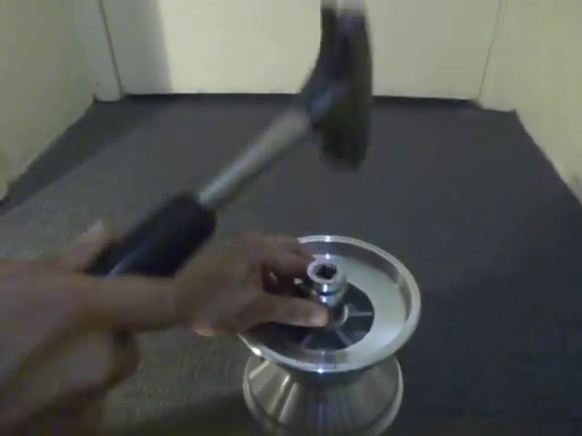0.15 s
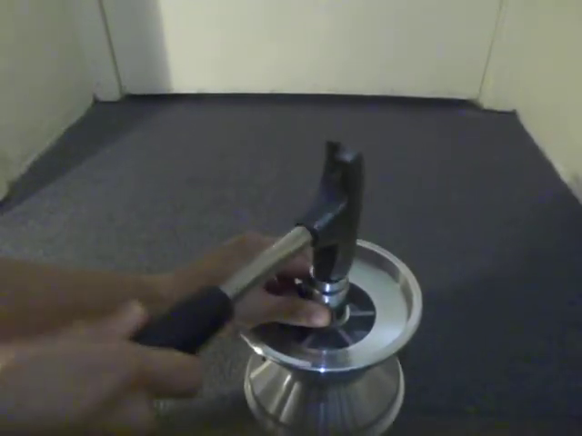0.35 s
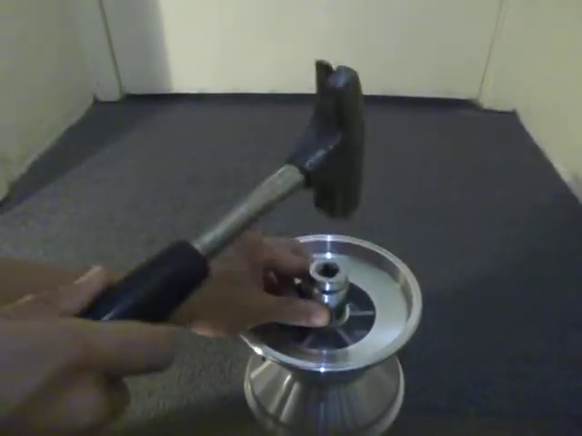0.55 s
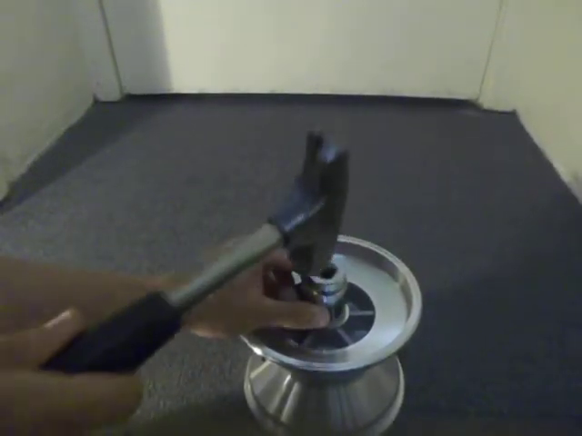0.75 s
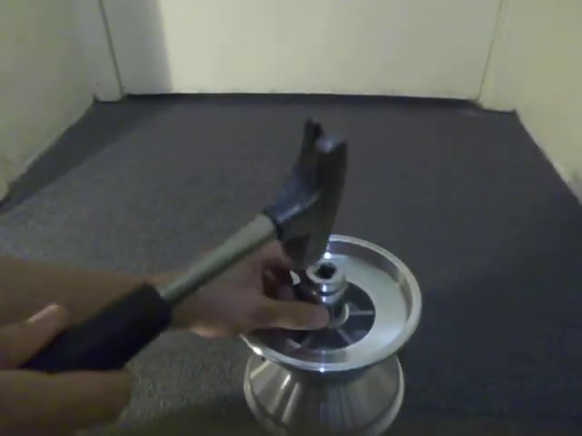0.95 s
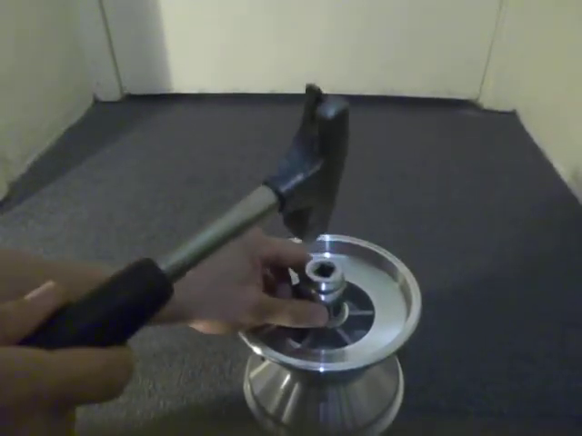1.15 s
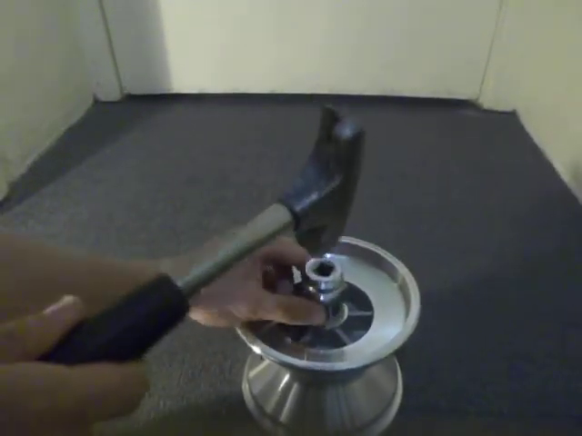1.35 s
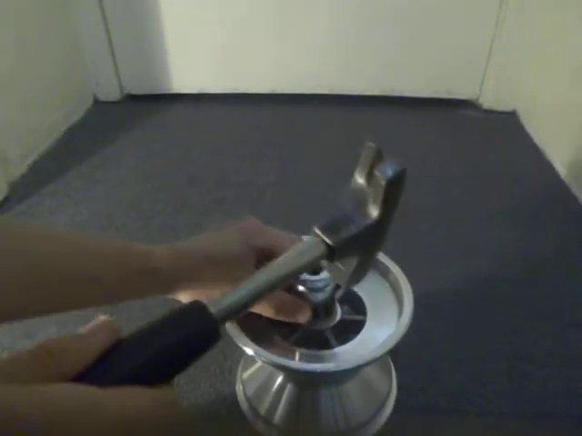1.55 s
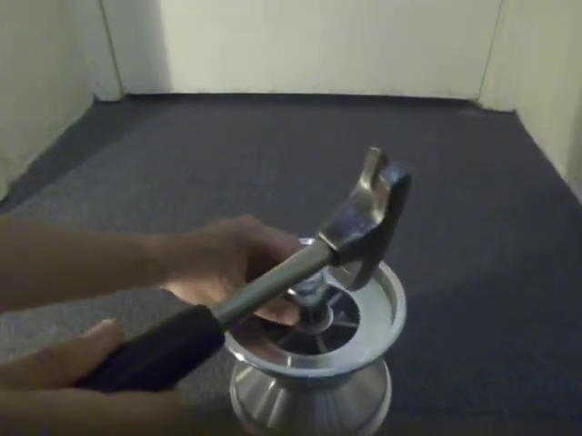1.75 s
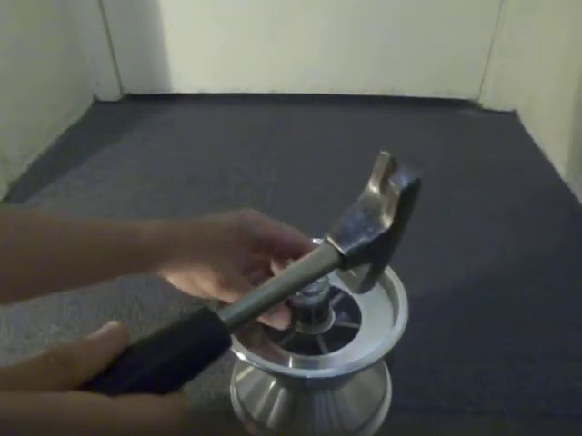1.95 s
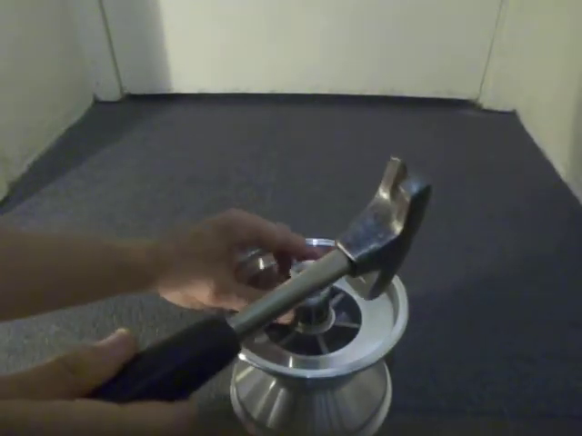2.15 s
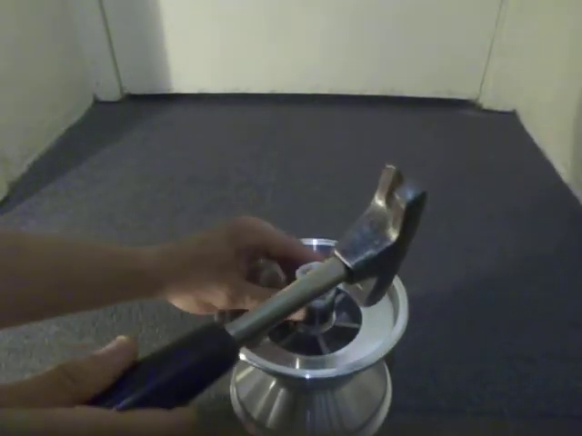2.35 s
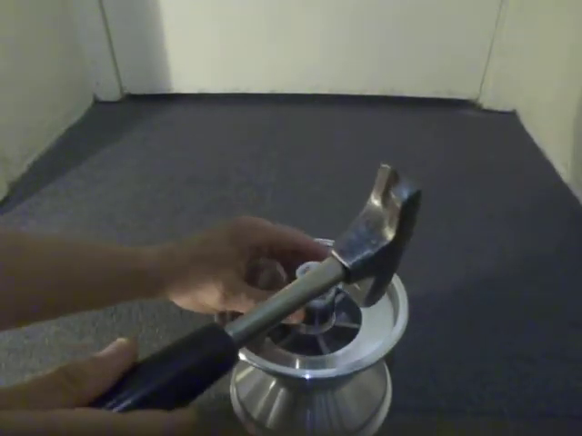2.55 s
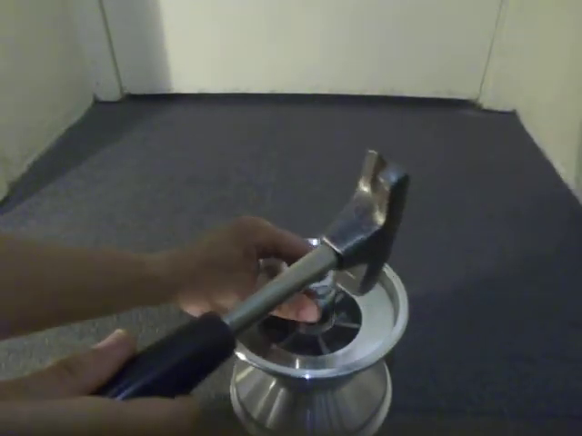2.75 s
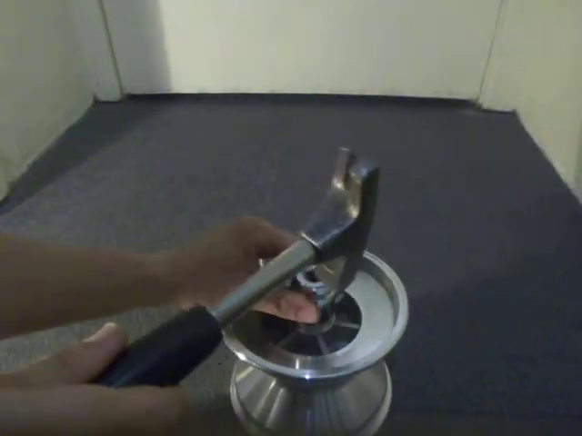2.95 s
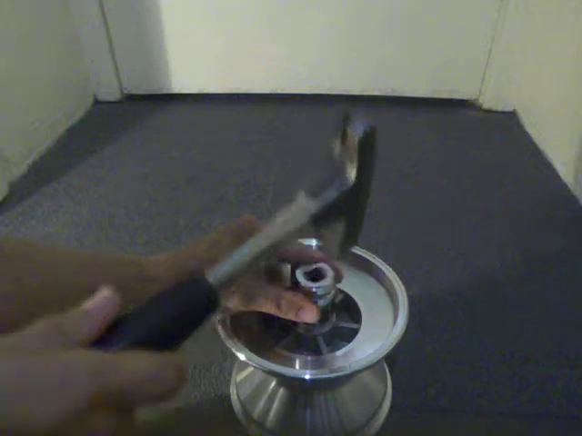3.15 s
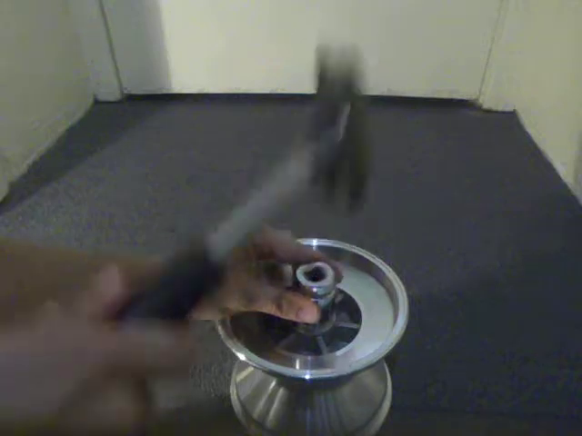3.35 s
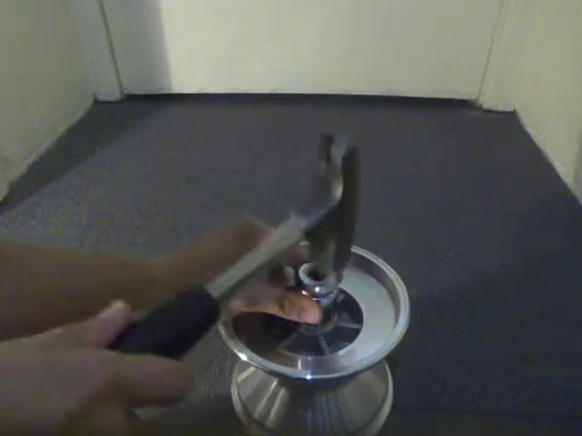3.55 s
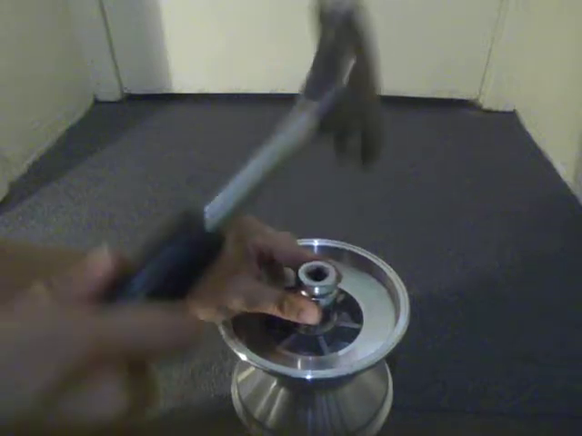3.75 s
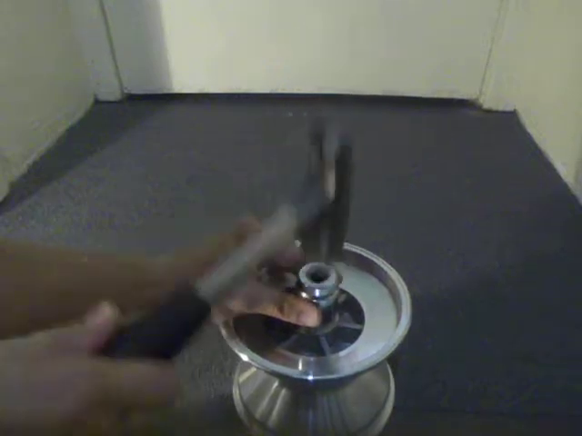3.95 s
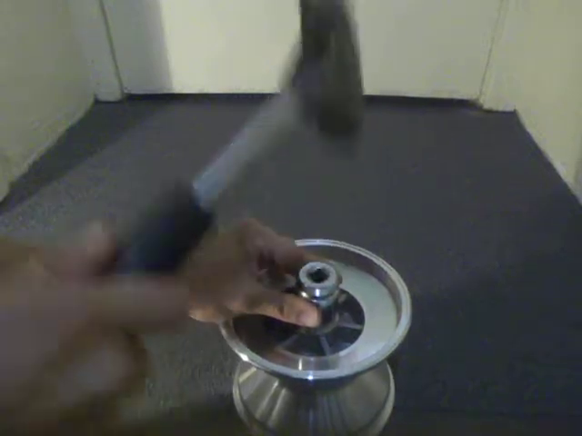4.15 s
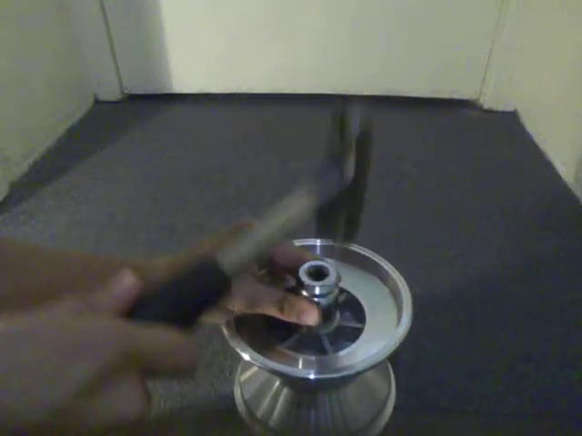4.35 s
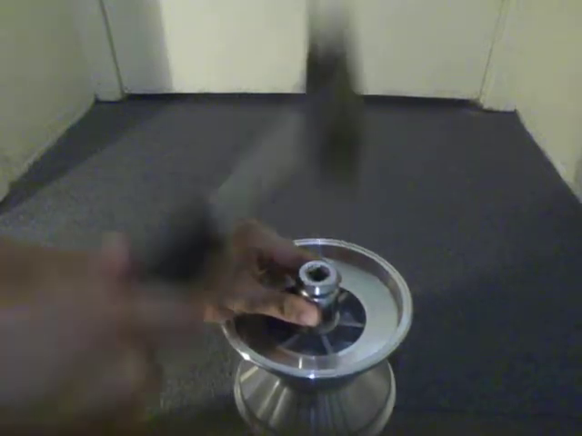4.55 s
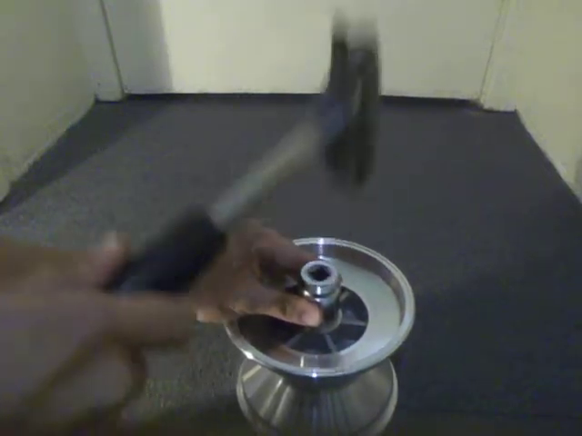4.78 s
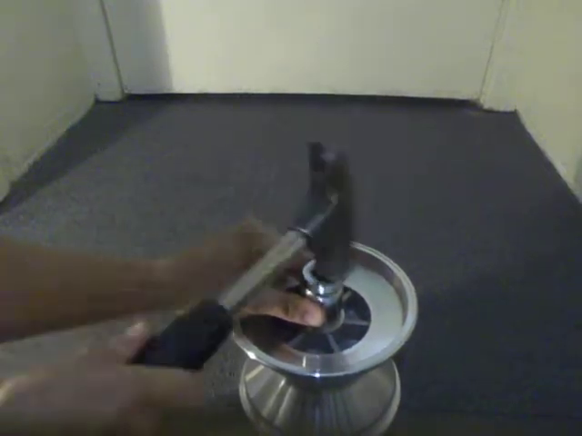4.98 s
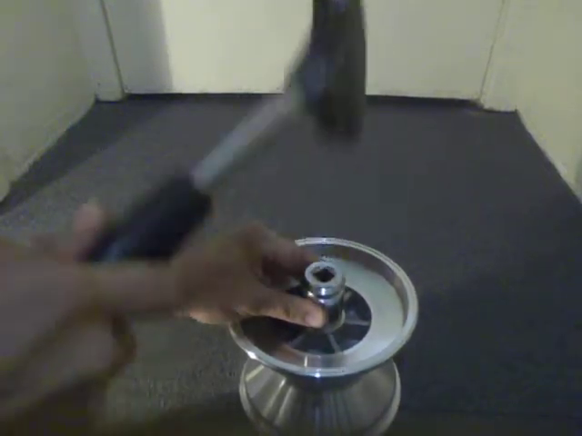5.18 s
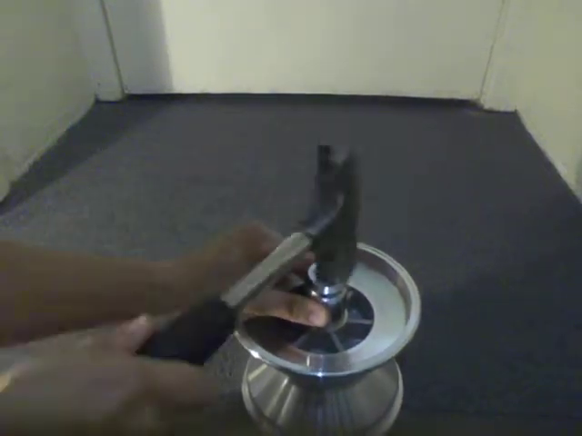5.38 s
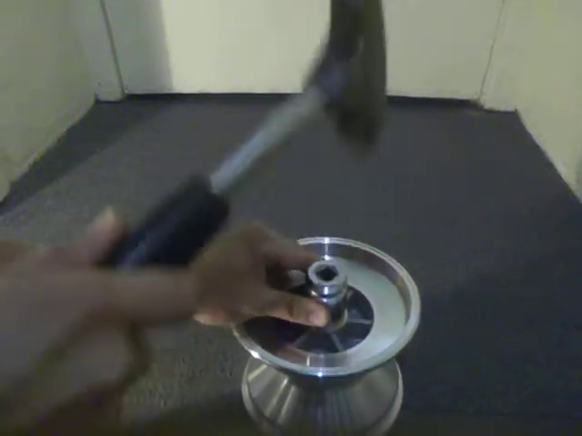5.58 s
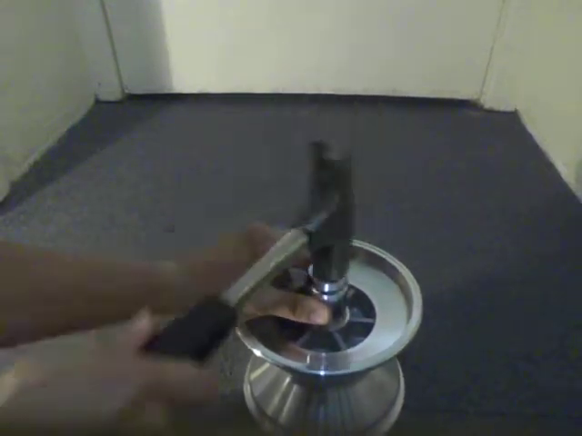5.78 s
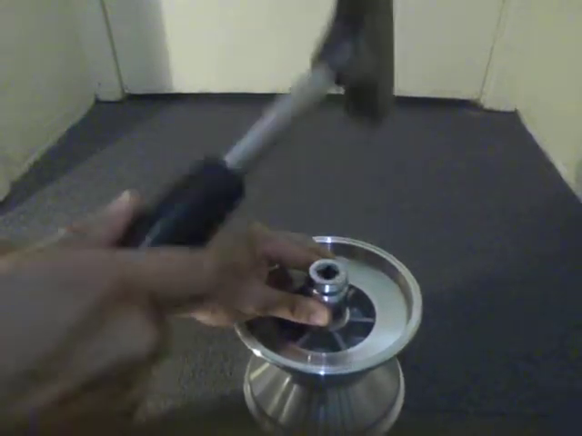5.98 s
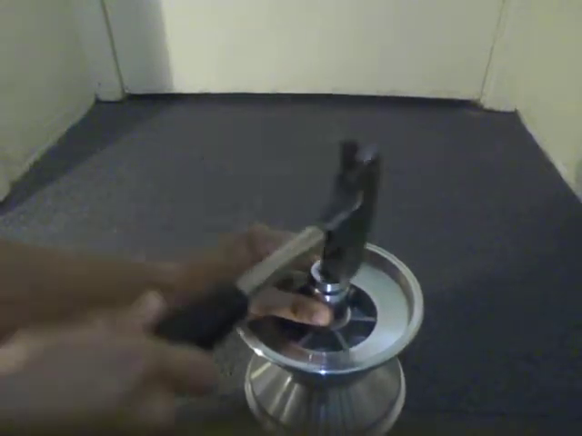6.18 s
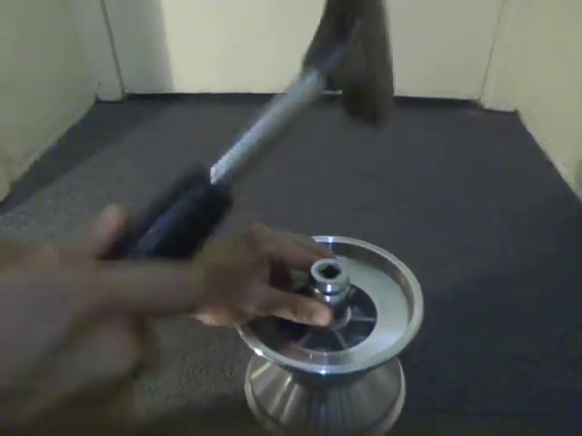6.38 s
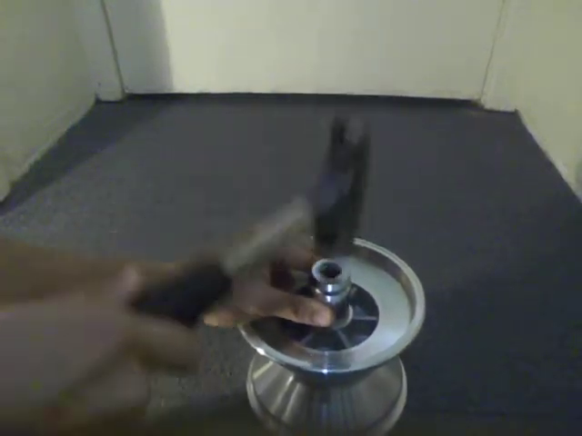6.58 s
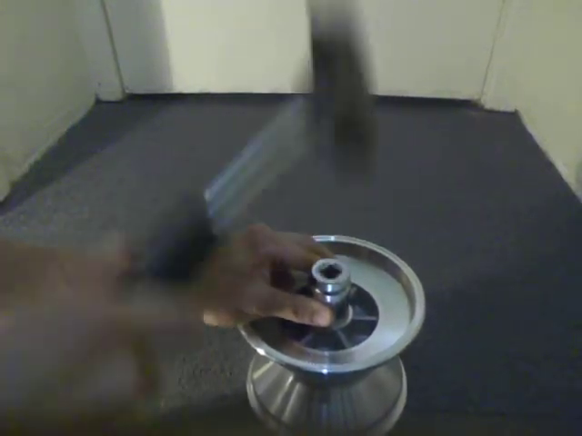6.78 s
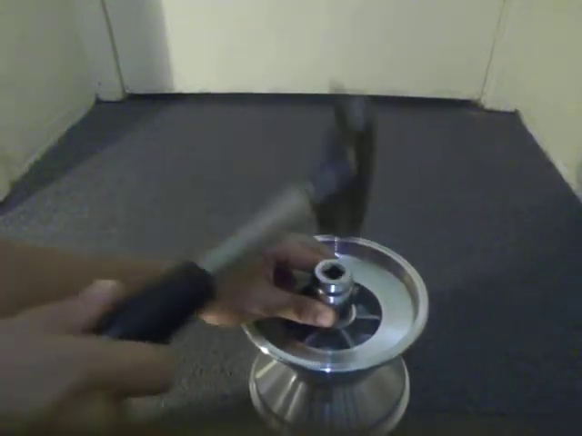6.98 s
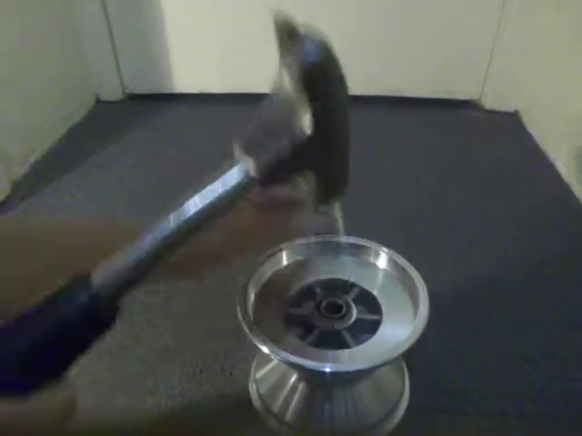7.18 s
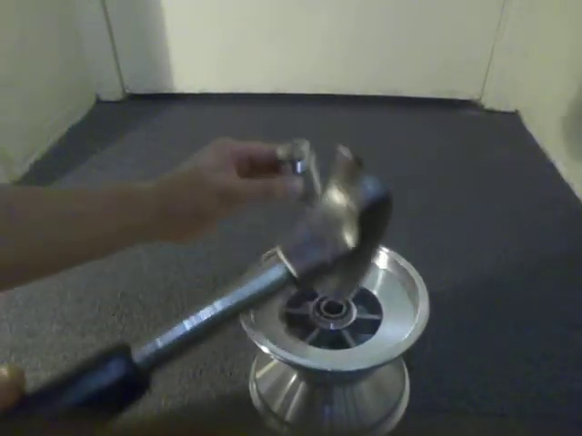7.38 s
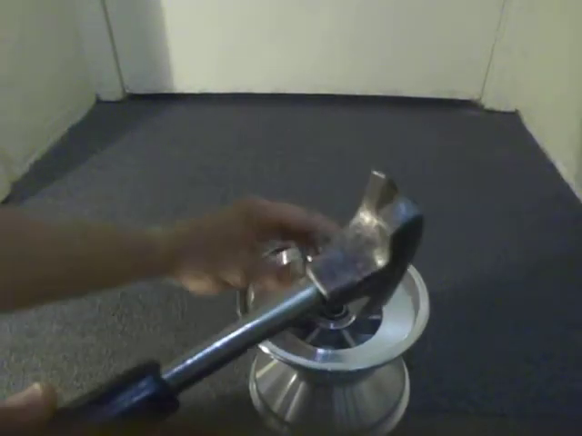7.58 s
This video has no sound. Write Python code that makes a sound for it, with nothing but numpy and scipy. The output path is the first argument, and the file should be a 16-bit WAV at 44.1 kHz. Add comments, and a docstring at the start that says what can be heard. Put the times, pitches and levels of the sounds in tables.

```python
"""Hammering a bearing into a wheel

A hammer drives a steel socket onto the bearing of an alloy wheel, on carpet in a narrow hallway.
We hear one blow, light taps as the socket is set straight, ten more blows, and a clink as it is
lifted off. Each blow is a knock of steel on steel that makes the wheel clank and the socket ping.
The hallway echoes, and the blows overload a small recorder with a low sampling rate."""
import sys
import numpy as np
from scipy import signal
from scipy.fft import rfft, irfft
from scipy.io import wavfile

SR = 44100
rng = np.random.default_rng(int(sys.argv[2]) if len(sys.argv) > 2 else 0)


def persist_wave(psi):
    """Save psi, clipped to +-1, as 16-bit WAV."""
    counts = np.round(np.clip(psi, -1, 1) * 32767).astype(np.int16)
    wavfile.write(sys.argv[1], SR, np.atleast_2d(counts).T)


N = 336042

# The wheel's ringing tones: f/Hz, level/dB, t60/s (the time to fade by 60 dB)
WHEEL_TONES = [(523, -11, .05), (640, -6.5, 0.082), (782, -4, .07), (836, -0.5, 0.18), (860, -4, .06),
               (920, -1, .08), (953, -4, .06), (1002.5, -8.5, 0.054), (1057, -4.5, .08), (1077, -3.5, 0.14),
               (1113.3, -1, 0.054), (1162.3, -2, .08), (1207, -4, 0.11), (1192, -3, 0.066),
               (1293, -5.5, .08), (1308, -4, .07), (1363, -8.5, 0.065)]
# The socket's side tones, which keep their pitch beside its main tone: f/Hz, level/dB, t60/s
SOCKET_TONES = [(2420, -21.5, 0.14), (3070, -14.5, .06), (3276, -7, 0.2), (5077, -20.5, .03)]


def blows():
    """Full hammer blows. The more firmly the socket sits, the lower and shorter its ping."""
    # t/s, clank level/dB, clank centre/Hz, ping level/dB, seating (0 bounces free, 1 stays pressed in)
    hits = [(-0.21, -19.5, 990, -8.5, 0), (0.169, -7, 1017, -4.5, 0), (3.2906, -7.5, 1195, -12.5, 0.74),
            (3.713, -13, 1024, -4.5, 0.45), (4.1117, -8, 930, -5.5, 0.01), (4.4869, -4.5, 1084, -8, 0.68),
            (4.8557, -11.5, 970, -8, 0.3), (5.2443, -6.5, 1170, -5.5, 0), (5.623, -6.5, 925, -7, 0.63),
            (5.9971, -5.5, 1096, -7.5, 1), (6.3618, -5.5, 1093, -2.5, 0.09),
            (6.7232, -3.5, 1062, -5.5, 0.57)]
    out, walls = np.zeros(N), hallway(build_s=0.0033)
    wheel = ringing(WHEEL_TONES, direct_db=-5, build_s=0.023)
    side_tones = ringing(SOCKET_TONES, direct_db=-10, build_s=0.005)
    knock_db = -9.4  # every swing lands about equally hard
    for s, clank_db, clank_hz, ping_db, seating in hits:
        ping_hz = 3306 - 125 * seating ** 3
        width_hz = 48 + 219 * seating
        add(out, s, from_db(knock_db) * knock(crack_db=-6.5, contact_hz=9100))
        add(out, s, from_db(clank_db) * clank(wheel, clank_hz, focus_db=20))
        add(out, s, from_db(ping_db) * ping(walls, side_tones, ping_hz, width_hz))
    return out


def knock(crack_db, contact_hz):
    """Steel on steel: a crack, a brief ring of the hub, then echoes. A lower contact_hz is duller."""
    # Tone colour of the knock: f/Hz, level/dB
    spectrum = [(40, -25), (90, -19), (140, -8), (220, -3), (450, -2), (700, 3), (1300, 5.5), (1750, 0.5),
                (2600, -5.5), (3150, -3.5), (3850, -10), (5300, -2), (7000, -14.5)]
    # Tones that linger between the hallway's walls (standing waves): f/Hz, level/dB, t60/s
    room_tones = [(140, -27, .9), (191.7, -24.5, 0.86), (322, -11.5, 0.67)]
    t = np.arange(SR) / SR
    crack = coloured(rng.standard_normal(SR), spectrum) * np.exp(-t / 0.0045)
    direct = unit_level(crack) + unit_level(dying_sine(hz=1197, t60=0.02))
    echoes = unit_level(hallway(build_s=0.0011, spectrum=spectrum))
    boom = sum(from_db(db) * dying_sine(hz, t60) for hz, db, t60 in room_tones)
    lowpass = signal.butter(4, contact_hz, fs=SR, output="sos")
    return signal.sosfilt(lowpass, from_db(crack_db) * direct + echoes + boom)


def clank(wheel, centre_hz, focus_db):
    """Every hit rings the same wheel tones; where it lands favours those near centre_hz."""
    octaves_away = np.abs(np.log2(np.array(WHEEL_TONES)[:, 0] / centre_hz))
    levels_db = -focus_db * np.minimum(octaves_away, 0.5) + rng.normal(0, 1.2, len(wheel))
    signs = rng.choice([-1, 1], len(wheel))
    return unit_level((from_db(levels_db) * signs) @ wheel)


def ping(walls, side_tones, hz, width_hz):
    """The socket rings with one main tone, plus side tones whose strength varies from hit to hit."""
    t60 = np.log(1000) / (np.pi * width_hz)  # a wider tone dies sooner
    main = in_hallway(dying_sine(hz, t60), walls, direct_db=-15)
    side_gains = from_db(rng.normal(0, 5.4, len(side_tones)))
    return unit_level(main + side_gains @ side_tones)


def touches():
    """Light, duller taps leave the loosely held socket free to ring; harder ones knock and ping more."""
    # t/s, clank level/dB, hardness (0 a nudge of the hub, 1 a crisp tap on the socket)
    taps = [(0.551, -45, 0.3), (0.558, -42.5, 0.75), (0.575, -40, .65), (0.637, -49, 0.8), (0.876, -67, .3),
            (0.981, -58, 0.5), (0.999, -57.5, 0.98), (1.812, -70, .4), (2.043, -63.5, .25),
            (2.122, -49.5, 0.82), (2.173, -50.5, 0.97), (2.194, -47, .75), (2.249, -54, .2),
            (2.601, -51, 0.98)]
    out, walls = np.zeros(N), hallway(build_s=0.008)
    wheel = ringing(WHEEL_TONES, direct_db=2, build_s=0.0018)
    side_tones = ringing(SOCKET_TONES, direct_db=2, build_s=0.003)
    for s, clank_db, hardness in taps:
        softness = 1 - hardness
        knock_db = clank_db - 5 - 23 * softness
        ping_db = clank_db - 3 - 30 * softness
        add(out, s, from_db(knock_db) * knock(crack_db=-28, contact_hz=2500))
        add(out, s, from_db(clank_db) * clank(wheel, centre_hz=1249, focus_db=34))
        add(out, s, from_db(ping_db) * ping(walls, side_tones, hz=3287, width_hz=87))
    return out


def clink(swell_s):
    """The lifted socket bumps the hammer. Its almost pure tone swells as the nearest walls return it."""
    # The bump against the hammer head: t/s, knock level/dB, ring level/dB
    bump = (7.556, -33, -13)
    # The socket's tones when it is free of the hub: f/Hz, level/dB, t60/s
    free_tones = [(2406, -26, .25), (3047, -26, .1), (3296, 0, .14), (3472, -24, .1), (5093, -34, .1)]
    s, knock_db, ring_db = bump
    out = np.zeros(N)
    swell = 1 - np.exp(-np.arange(SR) / SR / swell_s)
    ring = ringing(free_tones, direct_db=16, build_s=0.004).sum(axis=0) * swell
    add(out, s, from_db(knock_db) * knock(crack_db=-2, contact_hz=7000))
    add(out, s, from_db(ring_db) * unit_level(ring))
    return out


def ringing(tones, direct_db, build_s):
    """Struck metal, one row per tone: each fades away, heard directly and by way of the walls."""
    walls = hallway(build_s)
    return np.array([from_db(db) * in_hallway(dying_sine(hz, t60), walls, direct_db)
                     for hz, db, t60 in tones])


def dying_sine(hz, t60):
    """One second of a pure tone that fades by 60 dB every t60 seconds."""
    t = np.arange(SR) / SR
    return np.sin(2 * np.pi * hz * t) * from_db(-60 * t / t60)


def hallway(build_s, spectrum=((1, 0), (SR, 0))):
    """One second of echoes: they build up between close walls, then each band fades at its own rate."""
    # How long the hallway rings: f/Hz, t60/s
    ring_times = [(60, 0.33), (140, 0.65), (280, 0.51), (700, 0.38), (1200, 0.32), (1900, .37),
                  (3300, 0.34), (5000, 0.32)]
    t, hz = np.arange(SR) / SR, np.fft.rfftfreq(SR, 1 / SR)
    noise_spectrum = np.exp(2j * np.pi * rng.random(len(hz))) * from_db(at_hz(spectrum, hz))
    centres, t60s = np.transpose(ring_times)
    out = np.zeros(SR)
    for band, t60 in zip(np.eye(len(centres)), t60s):
        share = at_hz(np.column_stack([centres, band]), hz)  # overlapping bands that add up to one
        out += irfft(noise_spectrum * share, SR) * from_db(-60 * t / t60)
    return out * (1 - np.exp(-t / build_s))


def in_hallway(sound, walls, direct_db):
    """A sound, direct_db louder than its echoes, mixed with them and scaled to an energy of 1."""
    echoes = signal.fftconvolve(sound, walls)[:SR]
    heard = echoes / np.linalg.norm(echoes) + from_db(direct_db) * sound / np.linalg.norm(sound)
    return heard / np.linalg.norm(heard)


def background(hiss_db):
    """Faint, steady hiss, hum and a thin electronic whine."""
    # Tone colour of the hiss: f/Hz, level/dB
    spectrum = [(20, -3.5), (60, -5.5), (130, -0.5), (400, 1), (1200, -1.5), (3000, -9), (5000, -8),
                (5600, -15)]
    # Hum and whine: f/Hz, level/dB
    steady_tones = [(43.1, -63.5), (99, -74.5), (4969, -74)]
    t = np.arange(N) / SR
    hiss = coloured(rng.standard_normal(N), spectrum)
    tones = sum(from_db(db) * np.sqrt(2) * np.sin(2 * np.pi * hz * t) for hz, db in steady_tones)
    return from_db(hiss_db) * hiss / hiss.std() + tones


def from_db(db):
    """Turn decibels into a number to multiply by."""
    return 10 ** (np.asarray(db) / 20)


def at_hz(points, hz):
    """Read between the rows of a table, giving every octave equal room."""
    known_hz, values = np.transpose(points)
    return np.interp(np.log(np.maximum(hz, 1)), np.log(known_hz), values)


def coloured(noise, spectrum):
    """Give a noise the tone colour in a table."""
    hz = np.fft.rfftfreq(len(noise), 1 / SR)
    return irfft(rfft(noise) * from_db(at_hz(spectrum, hz)), len(noise))


def unit_level(sound):
    """Scale a sound so its first tenth of a second has an average (rms) level of 1."""
    return sound / np.sqrt(np.mean(sound[:SR // 10] ** 2))


def add(out, s, sound):
    """Mix a sound in at s seconds; what lies outside the scene is dropped."""
    start = round(s * SR)
    part = sound[max(-start, 0):N - start]
    out[max(start, 0):max(start, 0) + len(part)] += part


def scene():
    """All the sounds at one microphone."""
    return (blows() + touches() + clink(swell_s=0.012) + background(hiss_db=-61.5))[None]


def record(dry, converter_top=0.72, output_top=0.7, edge_hz=5520, offset=0.013, highest_hz=16000):
    """The recorder overloads at a quarter of the sample rate, so the ping's overtones fold down lower."""
    slow = signal.resample_poly(dry, 1, 4, axis=1) + offset
    pulses = np.zeros_like(dry)
    pulses[:, ::4] = 4 * np.clip(slow, -converter_top, converter_top)  # clipped, back at the full rate
    smoothing = signal.firwin(129, edge_hz, window=("kaiser", 7), fs=SR)
    smooth = signal.fftconvolve(pulses, smoothing[None], "same")
    clipped = np.clip(smooth, -output_top, output_top)  # peaks that overshoot are cut off again
    lowpass = signal.ellip(10, 0.1, 80, highest_hz, fs=SR, output="sos")
    return signal.sosfilt(lowpass, clipped)


dry = scene()
out = record(dry)
persist_wave(out)
```